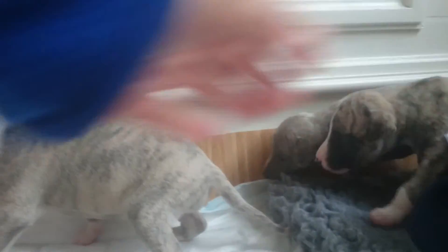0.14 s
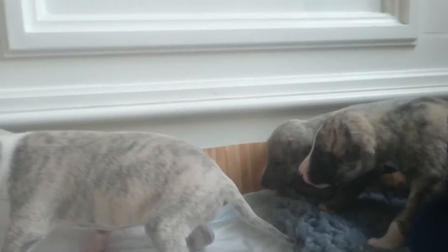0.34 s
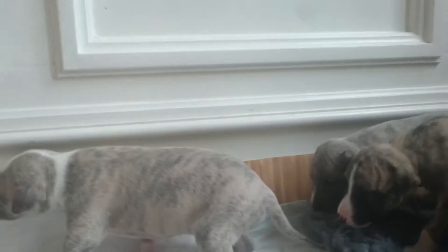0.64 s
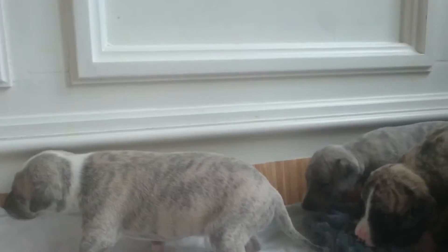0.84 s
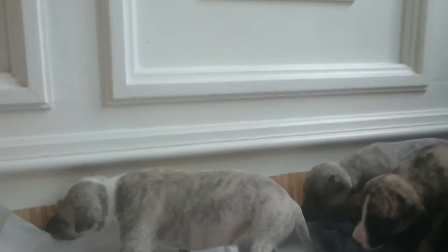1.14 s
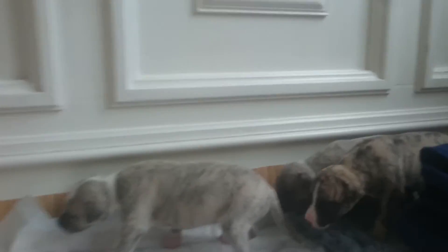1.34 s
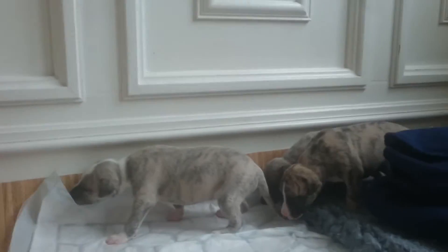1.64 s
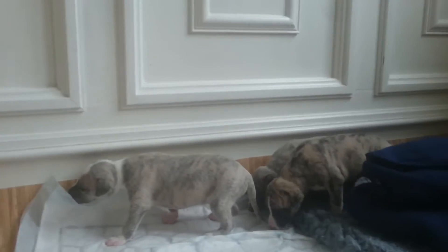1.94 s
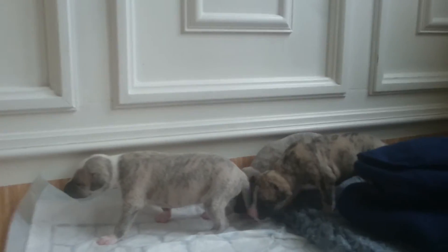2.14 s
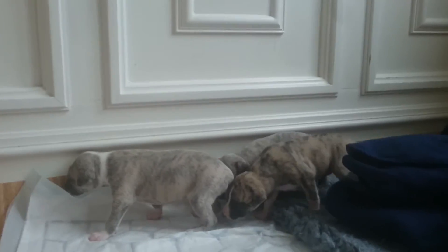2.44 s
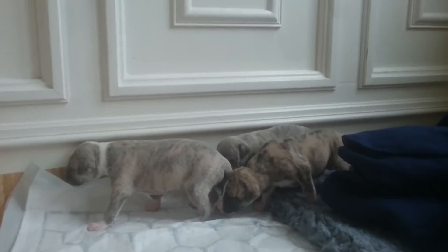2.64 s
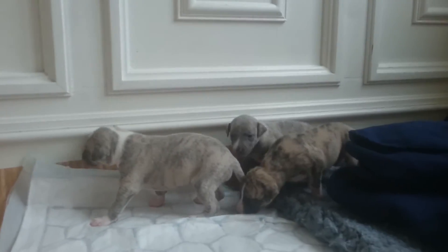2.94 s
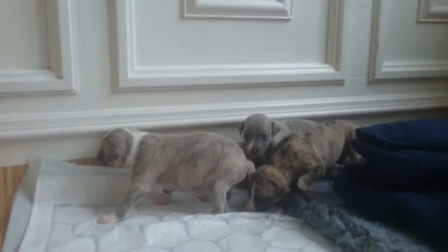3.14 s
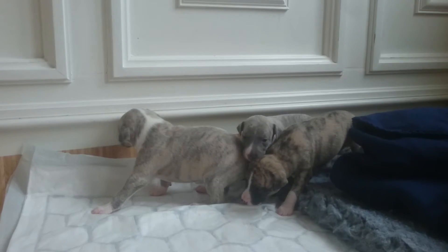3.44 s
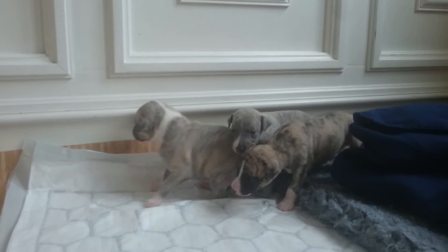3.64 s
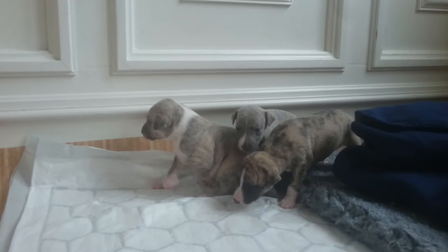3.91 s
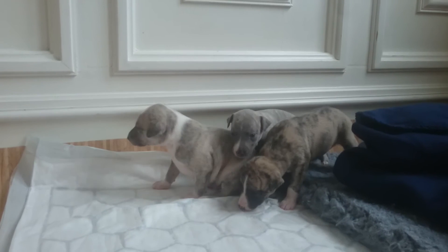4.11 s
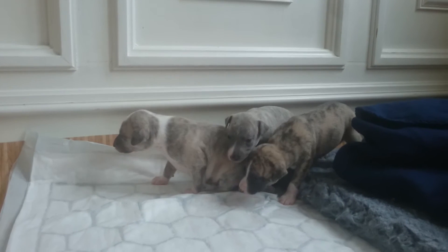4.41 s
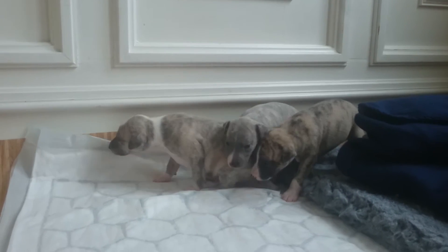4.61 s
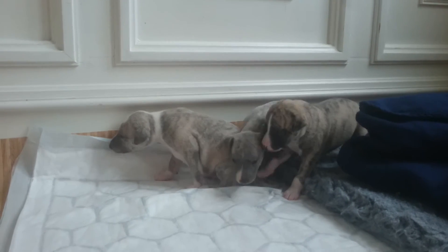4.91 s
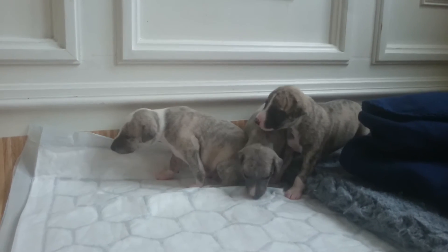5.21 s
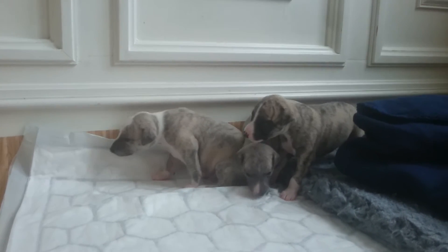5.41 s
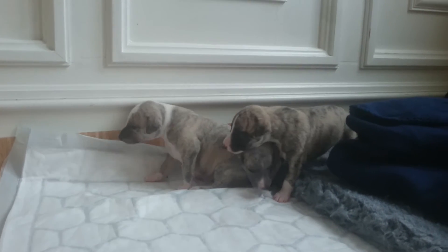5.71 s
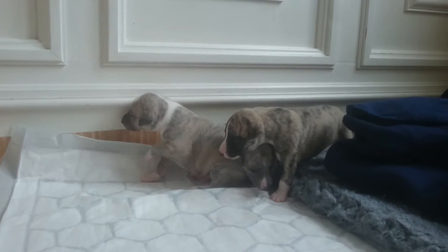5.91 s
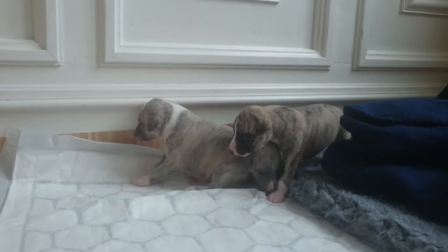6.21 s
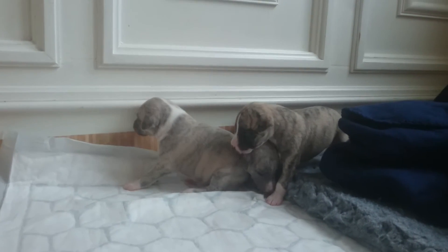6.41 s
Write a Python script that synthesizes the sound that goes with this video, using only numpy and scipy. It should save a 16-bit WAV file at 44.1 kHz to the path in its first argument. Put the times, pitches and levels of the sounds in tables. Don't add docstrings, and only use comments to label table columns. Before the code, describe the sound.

Several young puppies whine nasally and grunt close to the microphone, their paws rustling a plastic-backed pad and claws ticking. In the next room a cup and jar clink early, cutlery rattles around three seconds, then plates clack loudly after four and a bowl is set down. The handheld microphone rumbles softly indoors.

```python
import sys
import numpy as np
from scipy import signal
from scipy.fft import rfft, irfft
from scipy.io import wavfile
from scipy.ndimage import uniform_filter1d

SR = 44100
rng = np.random.default_rng(int(sys.argv[2]) if len(sys.argv) > 2 else 0)


def int16_out(signal):
    q = np.round(np.clip(np.atleast_2d(signal).T, -1, 1) * 32767)
    wavfile.write(sys.argv[1], SR, q.astype(np.int16))


def natural_amplitude(level_db):
    exponent = np.asarray(level_db, float) / 20
    return 10 ** exponent


N = 288855

# frequency in Hz, level in dB per Hz.
HUSH_SPECTRUM = [(24, -73), (40, 5.5), (155, -8), (320, -39), (630, -5.5), (733, -6), (896, -36),
                 (2260, -15), (4340, -20.5), (8990, -18), (16000, -31)]
# frequency in Hz, t60 in seconds.
ROOM_DECAY = [(250, 0.62), (1000, 0.16), (3000, 0.53), (6000, 0.24), (14000, 0.24)]

# start in seconds, peak in dB.
KNOCKS = [
    (0.962, -71.5),
    (4.285, -68.5),
    (4.435, -65),
    (5.203, -70.5),
    (5.356, -65.5),
]
# start in seconds, rumble in dB, seconds to fade 10 dB.
GRIP_SHIFTS = [(.22, -54.5, 0.12), (.97, -56, 0.36), (1.37, -49.5, 0.2), (2.17, -53, 0.17),
               (2.33, -47.5, 0.02), (3.0, -69, 1.5), (4.299, -35, -0.71), (4.44, -54, 0), (4.55, -42, 0),
               (4.67, -51.5, 0), (4.78, -51.5, 0.1), (5.07, -65, 0.5), (5.22, -52, 0.13),
               (5.376, -35.5, -0.21), (6.5, -58, 1)]

# start in seconds, peak in dB, low part in dB, ringing in dB,
# scrape length in seconds.
PLATE_BLOWS = [
    (4.2245, -22.5, -7, -26, 0.023),
    (4.281, -19.5, -4.5, -0.5, 0.011),
    (4.3983, -31, -16, -8, 0.012),
    (4.4108, -20, -3, -4, 0.013),
    (4.4525, -14.5, -22, -2, 0.0081),
    (4.4582, -13, -11, -4, 0.0033),
    (4.4716, -13, -14, 2.5, 0.0017),
    (4.4945, -14.5, -3, -0.5, 0.0032),
    (4.5065, -13.5, -29, -4, 0.0025),
]
CUP_BLOWS = [
    (1.212, -26.5, -8.5, -7.5, 0.0041),
    (1.221, -25.5, -9, -4, 0.0012),
    (1.233, -28.5, -5.5, -5.5, 0.0052),
    (1.255, -30.5, -0.5, -13, 0.019),
]
JAR_BLOWS = [
    (1.643, -27.5, -6.5, -10.5, .004),
    (1.651, -24.5, -8, -3, 0.004),
    (1.66, -26, -26, -17, 0.0019),
    (1.685, -37, -13, -17, 0.013),
]
DULL_BLOWS = [
    (0.0395, -26.5, -8, -9, 0.0079),
    (0.118, -27.5, -10, -8, 0.0045),
    (0.2528, -28.5, -9, -19, 0.0028),
    (0.662, -29, -24, -17, 0.0095),
    (1.4215, -26.5, 2.5, -11, 0.033),
    (2.1236, -24.5, -4, -24.5, 0.0089),
    (2.1968, -23, -40, -19, 0.0027),
    (2.2387, -25.5, -6.5, -26, 0.022),
    (5.4875, -42, 10.5, -10, 0.011),
]
SPOON_BLOWS = [(2.772, -28.5, -22, -46, 0.0025), (2.785, -20, -18, -12.5, 0.0029),
               (2.8868, -13.5, -59, -10.5, 0.011), (2.9501, -17.5, -42, -11.5, 0.028),
               (3.01, -23.5, -41, -17, 0.0013), (3.1258, -19, -37, -15, 0.062),
               (3.1933, -13.5, -19, -17, 0.0017), (3.248, -15, -7.5, -14.5, 0.0024),
               (3.3474, -22.5, -9.5, -18, 0.0027), (3.433, -21.5, -39, -5, 0.0024),
               (3.537, -21, -15.5, -20.5, 0.0027), (3.6174, -28, -20, -14, 0.0017)]
BOWL_BLOWS = [
    (5.383, -23, -3.5, -4, 0.0095),
    (5.809, -58, 0, -16, 0.002),
]
SPOON_TINKS = [
    (6.215, -35, -30, -17.5, .005),
]

PLATE_HZ = [2143, 2454, 3080, 3202, 3565, 3873, 4131, 4647, 4940, 5860, 7590]
CUP_HZ = [3203, 3844, 4549, 4653, 5647, 6148, 7590, 8290, 8640]
JAR_HZ = [2067, 3273, 3461, 3773, 4016, 4597, 4730, 4856, 5044, 5110, 5303, 5518, 7456]
SPOON_HZ = [1900, 2977, 4005, 5148, 6440, 7876, 9430, 11130, 12920, 14820]
BOWL_HZ = [1690, 2966, 3946, 4045, 5033, 5110, 5825, 7930, 8210, 10850, 12020, 13240, 13590]
# level in dB, t60 in seconds.
PLATE_MODES = [(-6, 0.084), (-8, 0.19), (0, 0.16), (-4.5, 0.19), (-2.5, 0.1), (1.5, 0.18), (1, 0.07),
               (5, 0.067), (1.5, 0.054), (-6, 0.055), (-23, .12)]
CUP_MODES = [(7, 0.33), (5, 0.18), (4, 0.15), (5, 0.075), (-2, 0.16), (-0.5, 0.12), (-10, 0.18),
             (-10, 0.23), (-10, 0.23)]
JAR_MODES = [(-14, 0.16), (-2, 0.17), (-2, 0.14), (0, 0.07), (5, 0.14), (-4, 0.11), (4, .12), (-8, 0.062),
             (-3, 0.11), (-13, 0.1), (-16, 0.18), (-1, 0.091), (-14, .15)]
SPOON_MODES = [(-6, 0.18), (1.5, 0.15), (3.5, 0.21), (4.5, 0.16), (-8, 0.46), (-8, 0.25), (-16.5, 0.28),
               (-16, 0.25), (-16, 0.22), (-10, 0.18)]
BOWL_MODES = [(-6, 0.41), (-8, 0.22), (-2, 0.3), (4, 0.3), (-4.5, 0.42), (2.5, 0.2), (0, 0.19), (-12, .25),
              (-10, .3), (-21, .25), (-24, .3), (-14, 0.13), (-14, 0.18)]

# frequency in Hz, level in dB per Hz.
RUSTLE_SPECTRUM = [(500, -23), (780, -2.5), (1520, -2), (3900, -1), (5500, 4), (7000, -7.5), (9000, -11),
                   (12000, -51)]
# start in seconds, rustle in dB, crisp top in dB, dull scuff in dB,
# seconds to fade 10 dB.
PAW_DRAGS = [(.03, -39, -53.5, -83, 0.04), (.15, -51, -79, -73.5, 0.3), (.29, -46, -81, -85, 0.07),
             (0.451, -56.5, -64, -94, 1.5), (0.601, -45.5, -50, -90, -0.92), (.75, -45.5, -54, -62, 0.11),
             (.87, -46, -55, -66.5, 0.18), (.97, -51.5, -51, -52.5, 0.01), (1.399, -51.5, -60.5, -63, 0.41),
             (1.7, -47.5, -53.5, -89, 0.27), (1.922, -41.5, -47, -73, 0.1646),
             (2.078, -37.5, -37.5, -67, 0.1134), (2.21, -46.5, -47, -66, 0.12),
             (2.37, -49.5, -53, -64.5, 0.12), (3.0, -52.5, -59, -68.5, 0.5), (3.34, -41.5, -73, -74, 0.31),
             (3.5, -73, -40.5, -77, 0.14), (3.72, -54.5, -80, -76.5, 1), (4.0, -55, -57, -89, 0),
             (4.475, -31.5, -48.5, -50.5, 0.1223), (4.85, -66, -66, -73.5, 0.4),
             (5.083, -49, -59, -81, 0.13), (5.3, -75, -81, -75.5, 0.66), (5.47, -47.5, -57, -52.5, 0.13),
             (5.82, -54.5, -52, -83, 0.09), (6.0, -56, -51, -70, 0.02), (6.098, -54, -50, -75, 0.08),
             (6.25, -63, -64, -75, 0.4), (6.47, -57.5, -71, -72.5, 0.8)]
# start in seconds, peak in dB, pitch in Hz, t60 in seconds.
PATS = [
    (1.189, -30.5, 4300, 0.011),
    (1.191, -33, 5940, 0.008),
    (1.30, -32, 2400, 0.013),
    (1.352, -25, 2290, 0.012),
    (1.622, -35, 1380, 0.014),
    (4.692, -36.5, 5170, 0.0099),
    (4.693, -36, 6200, .012),
    (5.362, -49, 2520, 0.012),
]
# start in seconds, peak in dB.
CLAW_TICKS = [(.511, -40), (.571, -34), (.602, -37), (.6775, -30), (.7098, -20), (.739, -36), (.7925, -36),
              (.8002, -29), (.813, -35), (.8265, -33), (.8488, -29), (.8595, -34), (.881, -34),
              (.8945, -31), (.9102, -21), (.9325, -32), (.951, -37), (.9705, -32), (2.039, -31),
              (3.01, -29), (5.78, -46)]
# start in seconds, peak in dB.
SHEET_SNAPS = [
    (0.6775, -39),
    (0.91, -38),
    (1.9753, -29),
    (2.1127, -29),
    (2.1331, -27),
    (2.1567, -24.5),
    (5.3448, -51),
]

# time in seconds, pitch in Hz, level in dB.
WHINES = [
    [(.025, 770, -53), (.035, 780, -46), (.052, 808, -45), (.066, 948, -41), (.085, 995, -43.5),
     (.12, 1001, -48), (.155, 990, -58)],
    [(.252, 656, -58), (.262, 596, -46), (.28, 607, -49), (.292, 697, -48), (.298, 710, -63)],
    [(.488, 812, -67), (.497, 775, -42), (.53, 748, -46.5), (.55, 790, -38), (.562, 867, -48),
     (.57, 770, -58), (.63, 750, -65)],
    [(.675, 812, -52), (.69, 794, -45), (.72, 770, -45), (.75, 802, -47), (.765, 876, -41.5),
     (.78, 742, -41), (.8, 688, -35.5), (.825, 629, -42), (.838, 630, -72)],
    [(.972, 806, -73), (.985, 771, -47.5), (1.01, 700, -44), (1.03, 739, -50), (1.09, 680, -64)],
    [(.312, 1170, -66), (.33, 1111, -57), (.348, 1077, -52), (.385, 1109, -55.5), (.41, 1020, -48),
     (.44, 1002, -55.5), (.485, 951, -50.5), (.515, 1002, -48.5), (.535, 950, -67)],
    [(.995, 516, -63), (1.015, 492, -49.5), (1.06, 452, -52.5), (1.08, 480, -83)],
    [(3.925, 1330, -65), (3.955, 1163, -64.5), (4.0, 1045, -54), (4.04, 946, -56), (4.1, 915, -56),
     (4.14, 896, -50), (4.176, 960, -65), (4.225, 900, -82)],
    [(5.955, 1149, -62), (5.975, 1150, -63.5), (6.024, 1236, -56), (6.055, 1167, -60), (6.096, 1070, -53.5),
     (6.142, 1103, -59), (6.2, 1102, -69), (6.26, 1053, -66)],
    [(6.298, 1152, -66), (6.316, 1168, -62), (6.34, 1300, -54), (6.365, 1360, -60), (6.39, 1114, -57),
     (6.414, 962, -55.5), (6.45, 921, -54.5), (6.5, 910, -57), (6.549, 878, -64)],
]
# time in seconds, pitch in Hz, level in dB.
CRIES = [
    [(3.5, 687, -66), (3.508, 717, -47.5), (3.525, 747, -46), (3.55, 720, -57)],
    [(4.062, 745, -67), (4.07, 743, -50), (4.1, 788, -46.5), (4.118, 844, -45), (4.128, 825, -61)],
    [(4.585, 674, -61), (4.62, 695, -55), (4.68, 715, -64.5), (4.715, 719, -55), (4.735, 750, -61)],
    [(4.76, 749, -52), (4.785, 686, -45.5), (4.804, 738, -55), (4.82, 727, -42), (4.85, 703, -45),
     (4.875, 720, -59)],
    [(5.02, 797, -59.5), (5.032, 860, -53), (5.06, 812, -49), (5.1, 791, -48), (5.128, 846, -63),
     (5.185, 905, -54.5), (5.2, 880, -73)],
    [(5.683, 675, -58), (5.704, 725, -43), (5.72, 795, -54), (5.735, 800, -68)],
    [(5.74, 892, -66), (5.778, 872, -55), (5.804, 771, -42), (5.83, 752, -50.5), (5.875, 770, -62),
     (5.895, 780, -68)],
    [(6.022, 770, -72), (6.036, 810, -61), (6.068, 804, -60), (6.08, 773, -72)],
]
WHINE_OCTAVES_DB = [-8, -8, -12.5, -12, -0.5, -2, 3, 1, -6, 0, -2, -6, 4.5, -7, -3, -7.5, -6, -3]
# time in seconds, pitch in Hz, level in dB.
SQUEAL = [(1.425, 870, -71), (1.445, 910, -56), (1.466, 868, -53), (1.485, 934, -57), (1.505, 970, -67),
          (1.52, 960, -82)]
# start in seconds, length in seconds, pitch in Hz, level in dB, octave in dB.
GRUNTS = [(0.201, 0.035, 786, -51.5, -6.5), (5.241, 0.028, 686, -49, -14), (1.867, 0.11, 868, -52.5, -1.5),
          (2.233, 0.051, 785, -41.5, -23), (3.22, 0.054, 671, -42.5, -4.5), (3.372, 0.015, 850, -44.5, -15),
          (3.62, 0.022, 728, -47.5, -21), (3.845, 0.021, 700, -51.5, -11), (5.001, 0.029, 729, -49.5, -10),
          (5.299, 0.071, 685.6, -44, -10), (5.547, 0.053, 834, -42, -8.5), (5.922, 0.039, 720, -48, -9.5),
          (6.376, 0.023, 612, -49.5, -7)]
# start in seconds, length in seconds, first pitch in Hz,
# level in dB, octave in dB.
SIGHS = [
    (1.901, 0.048, 770, -50, -6),
    (1.193, 0.05, 871, -38, -4),
    (1.705, 0.037, 749, -41.5, -4),
    (6.157, 0.039, 798, -49.5, -5.5),
]
# start in seconds, length in seconds, first pitch in Hz, level in dB,
# octave in dB.
YELPS = [
    (3.707, 0.043, 794, -46, -8),
    (3.917, 0.034, 766, -45.5, -12),
]

# frequency in Hz, gain in dB.
COMMON_GAIN = [(30, -16), (60, -11), (250, -12), (550, -9), (800, -4), (1100, 1), (2000, 0)]


def at_hz(points, hz):
    table_hz, values = np.array(points).T
    return np.interp(np.log(hz + 1), np.log(table_hz), values)


def rms_one(x):
    return x / np.sqrt(np.mean(x ** 2) + 1e-20)


def band(x, low_hz, high_hz, order=2):
    edges = [low_hz, min(high_hz, .45 * SR)]
    return signal.sosfilt(signal.butter(order, edges, "band", fs=SR, output="sos"), x)


def coloured(x, spectrum):
    gain = natural_amplitude(at_hz(spectrum, np.fft.rfftfreq(N, 1 / SR)))
    return rms_one(irfft(rfft(x) * gain, N))


def drift(rate):
    knots = rng.standard_normal(int(N / SR * 60) + 2)
    smooth = uniform_filter1d(knots, size=max(1, round(30 / rate)))
    return np.interp(np.arange(N) / SR * 60, np.arange(len(knots)), rms_one(smooth))


def peak(x, hz, width_hz):
    r = np.exp(-np.pi * width_hz / SR)
    gain = (1 - r * r) / 2
    return signal.lfilter([gain, 0, -gain], [1, -2 * r * np.cos(2 * np.pi * hz / SR), r * r], x)


def ring(clicks, hz, t60):
    r, w = natural_amplitude(-60 / (t60 * SR)), 2 * np.pi * hz / SR
    return signal.lfilter([0, np.sin(w)], [1, -2 * r * np.cos(w), r * r], clicks + 1e-18)


def swells(s, peak_db, fade_s, rise):
    t = np.arange(0, N + 64, 64) / SR
    late = (t - s[:, None]) / np.maximum(fade_s[:, None], .01)
    power = natural_amplitude(2 * peak_db) @ natural_amplitude(-20 * np.maximum(late, -late / rise))
    return np.interp(np.arange(N) / SR, t, np.sqrt(power))


def taps(events, level_db, low_hz, high_hz):
    clicks, sides = np.zeros((2, N)), rng.standard_normal((len(events), 1))
    for (s, peak_db), side in zip(events, sides):
        clicks[:, round(s * SR)] = natural_amplitude(peak_db + level_db + 2 * side * np.array([1, -1]))
    return band(clicks + 1e-18, low_hz, high_hz, order=3)


def room(x, build_s):
    t, tail = np.arange(SR // 2) / SR, 0
    edges = 100 * 2 ** np.arange(0, 8.0)
    for low, high in zip(edges, edges[1:] * [1, 1, 1, 1, 1, 1, 1.5]):
        decay = natural_amplitude(-60 * t / at_hz(ROOM_DECAY, np.sqrt(low * high)))
        tail = tail + band(rng.standard_normal((2, len(t))), low, high) * decay
    tail = tail * (1 - np.exp(-t / build_s))
    tail = tail / np.sqrt(np.sum(tail ** 2) / 2)
    return signal.fftconvolve(x[None], tail, axes=1)[:, :N]


def room_hush(far):
    hush = natural_amplitude(-63.5 + 6.0) * coloured(rng.standard_normal((2, N)), HUSH_SPECTRUM)
    loudness = uniform_filter1d(np.abs(far).mean(axis=0), size=3000)
    return hush / (1 + loudness / natural_amplitude(-14))


def handling():
    grip = natural_amplitude(-77) + swells(*np.transpose(GRIP_SHIFTS), rise=0.47)
    bass = rms_one(band(rng.standard_normal((2, N)), 37, 115.5, order=3))
    rumble = grip * natural_amplitude(5.5 + 4.7 * drift(22)) * bass
    return rumble + taps(KNOCKS, level_db=77.5, low_hz=44.7, high_hz=248)


def clatter(blows, pitches, modes, ring_db, crack_db, high_db, body_hz, body_db):
    noise, cracks = rng.standard_normal(N), np.zeros(N)
    low = rms_one(band(noise, 450, 1700, order=4))
    middle = rms_one(band(noise, 1700, 7000, order=4))
    high = rms_one(band(noise, 7000, 17000, order=4))
    middle = middle + natural_amplitude(body_db) * rms_one(peak(peak(noise, body_hz, 260), body_hz, 260))
    luck = rng.standard_normal((len(blows), len(modes)))
    clicks = np.zeros((len(modes), N))
    for k, (s, peak_db, low_db, own_db, skid_s) in enumerate(blows):
        at, span = round(s * SR), round(max(skid_s, .002) * 5 * SR)
        skid = slice(at, at + span)
        shape = np.exp(-np.arange(span) / (span / 5)) / np.sqrt(span / SR)
        crack = natural_amplitude(low_db) * low[skid] + middle[skid] + natural_amplitude(high_db) * high[skid]
        cracks[skid] += natural_amplitude(peak_db + crack_db) * shape * crack
        clicks[:, at] = natural_amplitude(peak_db + own_db + ring_db + 2.5 * luck[k])
    rings = np.zeros(N)
    for row, hz, (db, t60) in zip(clicks, pitches, modes):
        rings += natural_amplitude(db) * (ring(row, hz, t60) - ring(row, hz, 0.008))
    return np.array([cracks, rings])


def next_room():
    dishes = clatter(PLATE_BLOWS, PLATE_HZ, PLATE_MODES, ring_db=-9.5, crack_db=-19.0, high_db=-22.5,
                     body_hz=3880, body_db=-6.0)
    dishes += clatter(CUP_BLOWS, CUP_HZ, CUP_MODES, ring_db=-4, crack_db=-20.0, high_db=-22,
                      body_hz=4540, body_db=-3.0)
    dishes += clatter(JAR_BLOWS, JAR_HZ, JAR_MODES, ring_db=-4.5, crack_db=-18.0, high_db=-20.0,
                      body_hz=4895, body_db=-2.5)
    dishes += clatter(DULL_BLOWS, PLATE_HZ, PLATE_MODES, ring_db=-32, crack_db=-15, high_db=-41,
                      body_hz=1620, body_db=-20)
    dishes += clatter(SPOON_BLOWS, SPOON_HZ, SPOON_MODES, ring_db=-3.5, crack_db=-17, high_db=-19.5,
                      body_hz=1778, body_db=-7.5)
    dishes += clatter(BOWL_BLOWS, BOWL_HZ, BOWL_MODES, ring_db=-0.5, crack_db=-14.5, high_db=-27,
                      body_hz=4976, body_db=-2.5)
    cracks, rings = dishes
    direct = natural_amplitude(-16) * cracks + natural_amplitude(-4.5) * rings
    return room(cracks + natural_amplitude(-5) * rings, build_s=0.004) + np.array([direct, np.roll(direct, 24)])


def tinks():
    cracks, rings = clatter(SPOON_TINKS, SPOON_HZ[2:3], SPOON_MODES[2:3], ring_db=-2.1, crack_db=-17,
                            high_db=-17, body_hz=1800, body_db=-9)
    return rings


def crinkle(per_s, spread_db):
    born = rng.random((2, N)) < per_s / SR
    heights = natural_amplitude(spread_db * np.minimum(rng.exponential(1, (2, N)), 4))
    grains = born * heights * rng.standard_normal((2, N))
    return rms_one(grains) + .9 * rng.standard_normal((2, N))


def pad():
    s, *layers_db, fade_s = np.transpose(PAW_DRAGS)
    rustle, crisp, scuff = (swells(s, db, fade_s, rise=0.69) for db in layers_db)
    grains, flicker_db = crinkle(per_s=3000, spread_db=3.5), 1.5 * drift(15)
    rustle = rustle * natural_amplitude(2.5) * coloured(grains, RUSTLE_SPECTRUM)
    top = rms_one(band(grains, 4400, 23000)) + natural_amplitude(-10) * rms_one(band(grains, 14800, 18600))
    crisp = crisp * natural_amplitude(np.array([[1], [-4]])) * top
    scuff = scuff * natural_amplitude(17.0) * rms_one(band(rng.standard_normal((2, N)), 160, 717))
    return natural_amplitude(flicker_db) * (rustle + crisp + scuff)


def pats():
    out, span = np.zeros(N), SR // 10
    for s, peak_db, hz, t60 in PATS:
        click = natural_amplitude(peak_db) * rng.standard_normal(span) * np.exp(-np.arange(span) / 30) / 4
        at = round(s * SR)
        out[at:at + span] += ring(click, hz, max(t60, .003))
    return out * natural_amplitude(np.array([[1.5], [-1.5]])) + natural_amplitude(-0.5) * room(out, build_s=0.0022)


def claws():
    ticks = taps(CLAW_TICKS, level_db=15, low_hz=3000, high_hz=6800)
    return ticks + taps(SHEET_SNAPS, level_db=15.5, low_hz=7800, high_hz=16700)


def whines(tables, octaves_db):
    calls = []
    for rows, octave_db in zip(tables, octaves_db):
        s, hz, db = np.transpose(rows)
        t = np.arange(s[0], min(s[-1], (N - 9) / SR), 1 / SR)
        level_db = np.interp(t, s, db)[:N - round(s[0] * SR)]
        calls.append((s[0], s[-1] - s[0], level_db, octave_db, np.interp(t, s, hz)))
    return calls


def grunts():
    calls = []
    for s, length, hz, db, octave_db in GRUNTS:
        t = np.arange(length * SR) / SR
        arch = 1 + .04 * (np.sin(np.pi * t / length) - .7)
        calls.append((s, length, db, octave_db, hz * arch))
    for table, fall_hz_per_s in ((SIGHS, 3300), (YELPS, 7000)):
        for s, length, hz, db, octave_db in table:
            t = np.arange(length * SR) / SR
            calls.append((s, length, db, octave_db, hz - fall_hz_per_s * t))
    return calls


def puppy(calls, jitter, rasp_db, upper_db, air_db, nose_db, quaver_db, swell):
    nose_hz, nose_width_hz = 5500, 550
    nose_opens_hz, nose_full_hz = 900, 1090
    out, unsteady = np.zeros(N), drift(25)
    waver, quaver = 1 + jitter * unsteady, natural_amplitude(quaver_db * unsteady[::-1])
    rasp = rms_one(signal.lfilter([1], [1, -.97], rng.standard_normal(N)))
    air = rms_one(band(rng.standard_normal(N), 5500, 8800))
    for s, length, db, octave_db, pitch in calls:
        start = round(s * SR)
        stop = min(N, start + len(pitch))
        call = slice(start, stop)
        hz = pitch[:stop - start]
        turn = 2 * np.pi * np.cumsum(hz * waver[call]) / SR
        nasal = natural_amplitude(nose_db) * np.clip((hz - nose_opens_hz) / (nose_full_hz - nose_opens_hz), .13, 1)
        upper = 0
        for k in range(3, 13):
            lift = nasal / (1 + ((k * hz - nose_hz) / nose_width_hz) ** 2)
            upper = upper + np.sin(k * turn) * (natural_amplitude(upper_db) + lift)
        voice = np.sin(turn) + natural_amplitude(octave_db) * np.sin(2 * turn) + upper + natural_amplitude(air_db) * air[call]
        breath = np.abs(np.sin(np.pi * np.arange(stop - start) / len(pitch))) ** swell
        effort = breath * quaver[call]
        out[call] += np.sqrt(2) * natural_amplitude(db) * voice * effort * (1 + natural_amplitude(rasp_db) * rasp[call])
    return out


def squealer():
    squeal = puppy(whines([SQUEAL], [0]), jitter=0.0015, rasp_db=-21, upper_db=-1, air_db=-29.5,
                   nose_db=3, quaver_db=3, swell=0)
    return band(squeal, 2800, 9600, order=4) * natural_amplitude(np.array([[-4], [2.5]]))


def litter():
    voices = puppy(whines(WHINES + CRIES, WHINE_OCTAVES_DB), jitter=.013, rasp_db=-10, upper_db=-30,
                   air_db=-26, nose_db=3, quaver_db=4, swell=0)
    voices += puppy(grunts(), jitter=0.0167, rasp_db=-11.5, upper_db=-42, air_db=-20.0,
                    nose_db=7.5, quaver_db=5.5, swell=0.43)
    off_axis = np.array([np.roll(voices, 5), voices])
    return off_axis * natural_amplitude(np.array([[-1.5], [1.5]])) + natural_amplitude(-3.5) * room(voices, build_s=0.001)


def scene():
    far = next_room()
    background = room_hush(far) + handling() + far + tinks()
    return background + pad() + pats() + claws() + squealer() + litter()


def band_limit(x):
    return signal.sosfilt(signal.butter(12, 16610, fs=SR, output="sos"), x)


def record(dry):
    mid, side = (dry[0] + dry[1]) / 2, (dry[0] - dry[1]) / 2
    mid = irfft(rfft(mid) * natural_amplitude(at_hz(COMMON_GAIN, np.fft.rfftfreq(N, 1 / SR))), N)
    pair = np.array([mid + side, mid - side])
    port = pair + natural_amplitude(-2.0) * peak(pair, 5200, 1330) - 0.45 * peak(pair, 11800, 15000)
    port = port + natural_amplitude(16.5) * peak(pair, 22000, 1830)
    top_cut = signal.cheby2(14, 38, 15950, fs=SR, output="sos")
    mix = signal.sosfilt(top_cut, port * natural_amplitude(np.array([[-3.5], [-2.5]])))
    return band_limit(mix)


dry = scene()
out = record(dry)
int16_out(out)
```